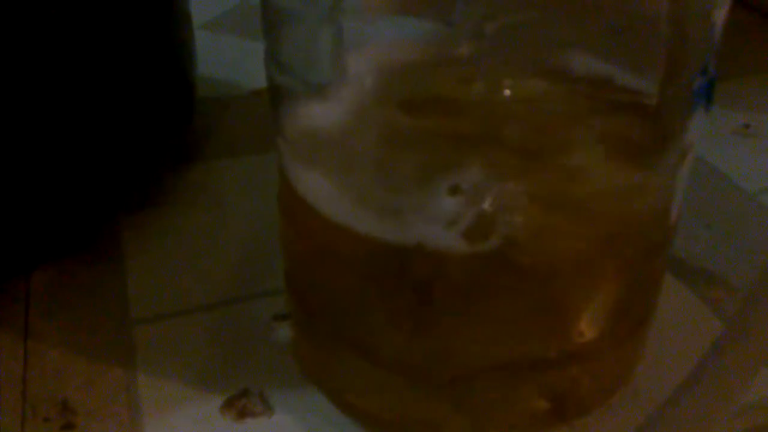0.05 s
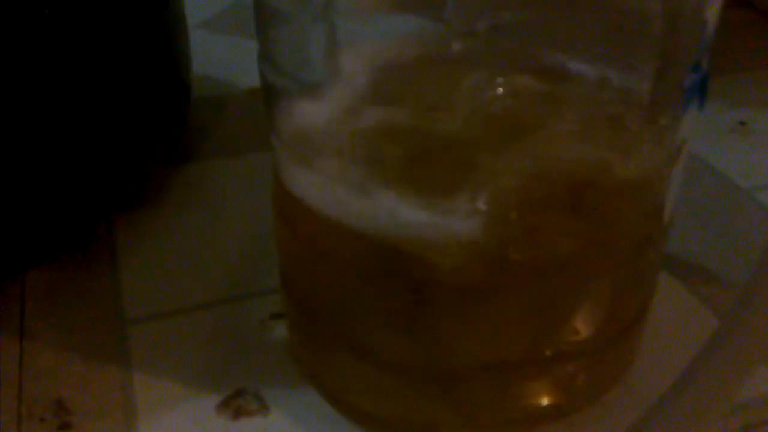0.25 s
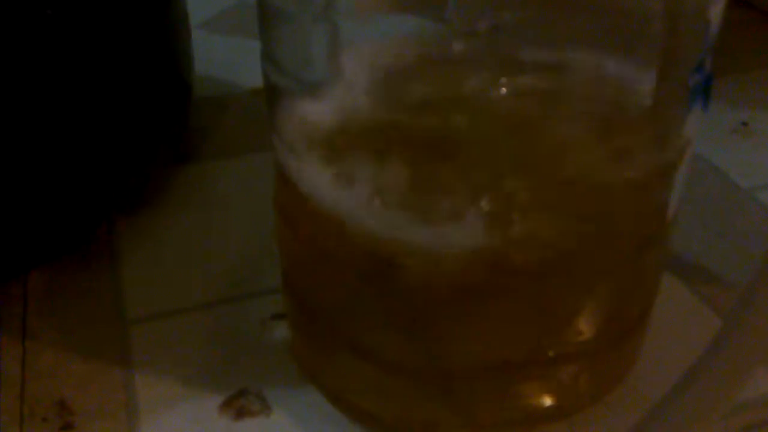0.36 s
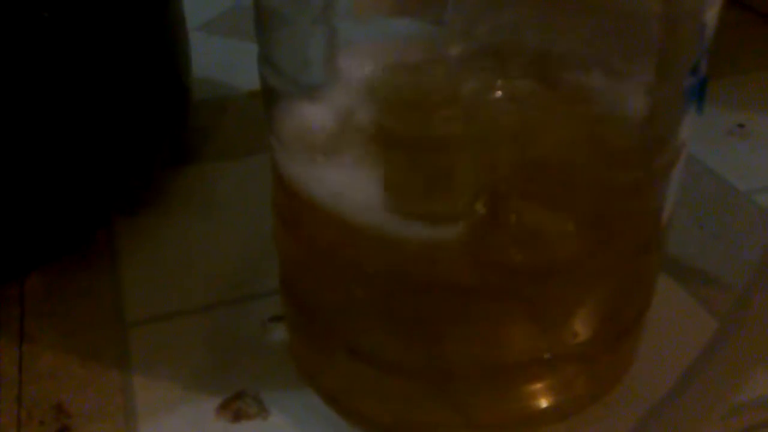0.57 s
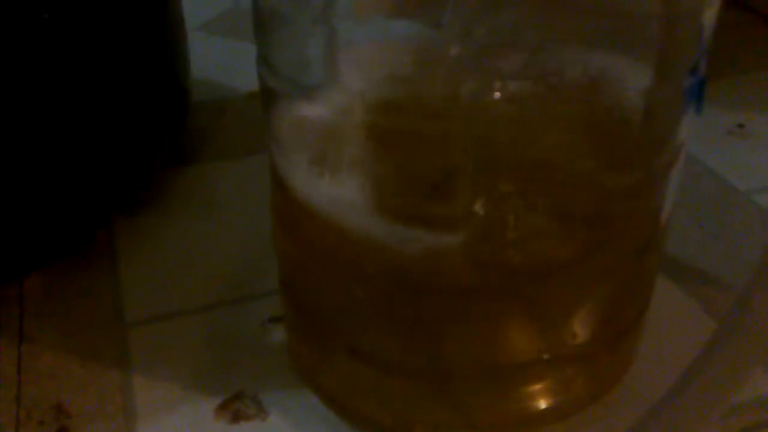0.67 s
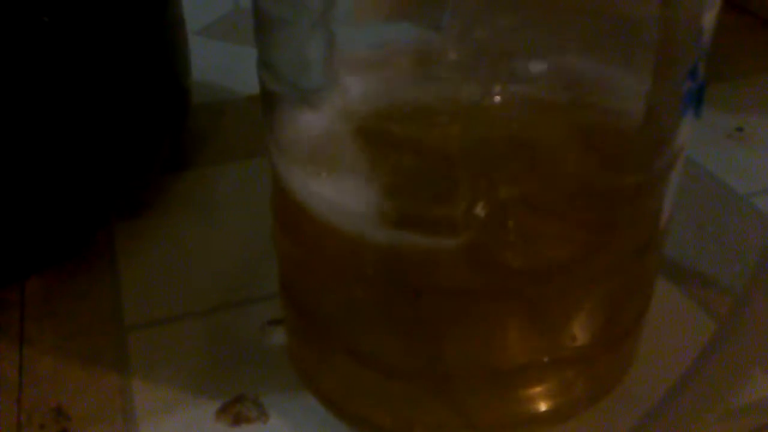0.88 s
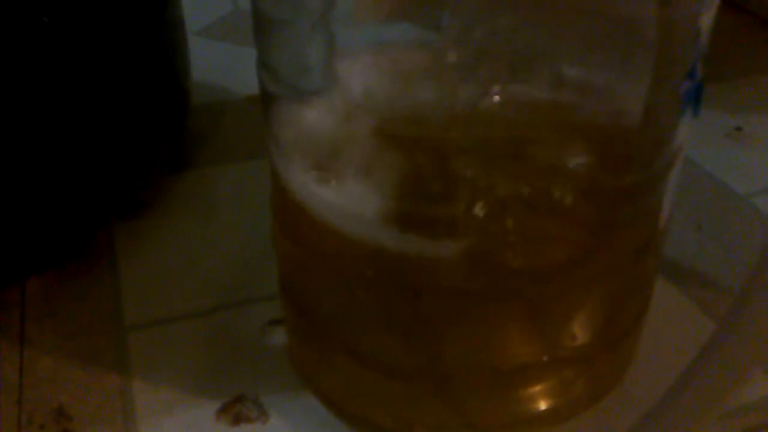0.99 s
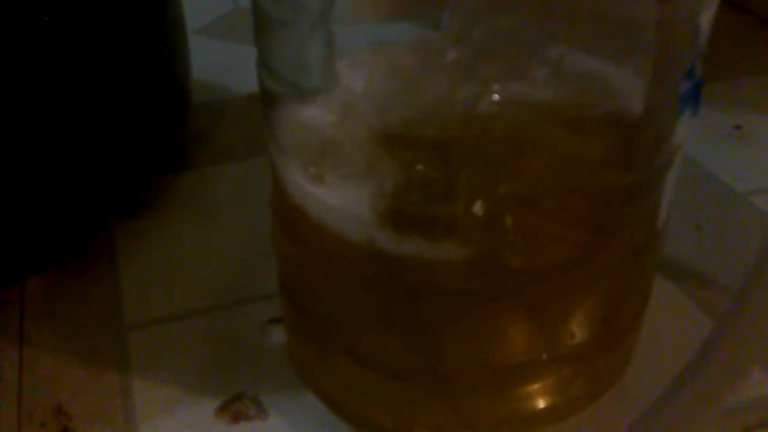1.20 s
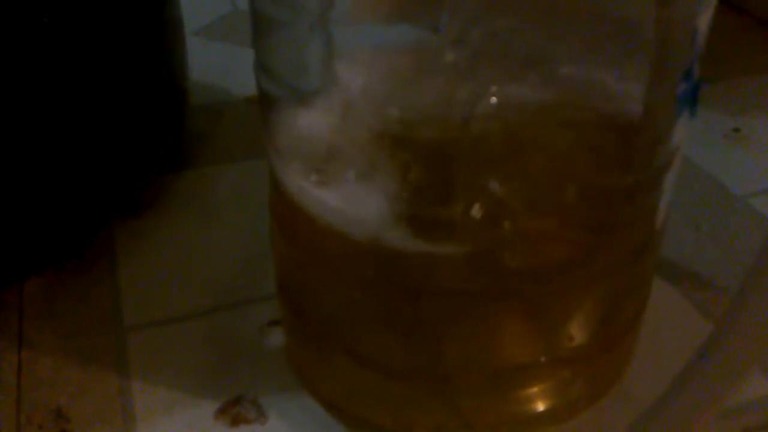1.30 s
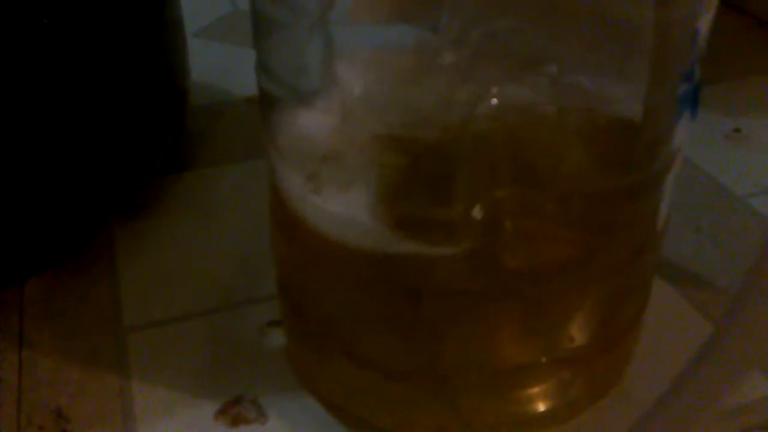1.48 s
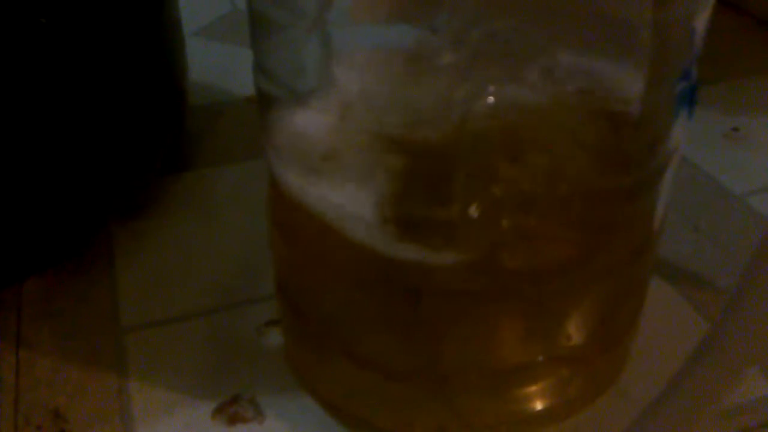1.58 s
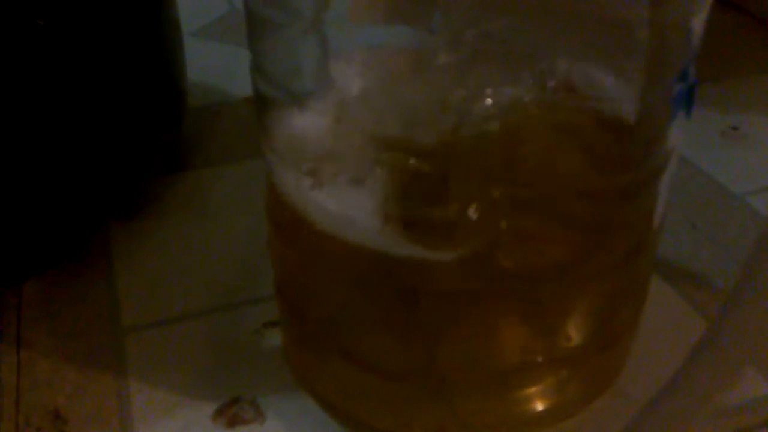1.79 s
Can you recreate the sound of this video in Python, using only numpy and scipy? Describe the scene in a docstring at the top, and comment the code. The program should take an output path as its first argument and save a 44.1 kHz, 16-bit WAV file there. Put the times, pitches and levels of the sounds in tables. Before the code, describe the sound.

Liquid bubbles in a large glass vessel, close up in a small room. From about 0.2 to 0.8 seconds it churns with quick low glugs, wet splats and plinking bubbles, loudest near 0.4 seconds. Slower, regular glugs follow with scattered pops and tiny rising whistles. Pops lightly ping the glass around 0.7 and 1.3 seconds. The bubbling fades by 1.8 seconds, over low sloshing, faint hiss and rumble.

```python
"""A burst of churning, then slower, regular glugs: a brew bubbling in a large glass vessel indoors.
Each gulp of gas rings the vessel's low modes and comes with a wet rush. At the surface, bubbles plink,
films burst, shrinking gas pockets whistle and two pops ping the glass. Close reflections and a small
room surround it, over low sloshing, faint hiss and rumble."""
import sys
import numpy as np
from scipy import signal
from scipy.fft import rfft, irfft
from scipy.io import wavfile

SR = 44100
rng = np.random.default_rng(int(sys.argv[2]) if len(sys.argv) > 2 else 0)


def dump(signal):
    """Clip the signal to [-1, 1] and save it as 16-bit WAV at the path in sys.argv[1]."""
    limited = np.clip(np.atleast_2d(signal).T, -1, 1)
    pcm = np.round(limited * 32767).astype(np.int16)
    wavfile.write(sys.argv[1], SR, pcm)


N = 81585
PLINK_ATTACK_S = 0.0017  # bubbles and glass pings share this soft edge


def amp(db):
    """Decibels to gain."""
    return 10 ** (np.asarray(db) / 20)


def unit(x):
    """Scales to rms 1."""
    return x / np.sqrt(np.mean(x ** 2) + 1e-20)


def colour(points, hz):
    """Reads a curve over log frequency."""
    f, value = np.transpose(points)
    return np.interp(np.log(hz + 1), np.log(f + 1), value)


def ticks(size):
    """Sample times in seconds."""
    return np.arange(size) / SR


def fader(points):
    """Gain per sample from a level curve in dB."""
    return amp(np.interp(ticks(N), *np.transpose(points)))


def add(mix, start_s, sound):
    """Drops a sound into the mix."""
    part = mix[max(round(start_s * SR), 0):][:len(sound)]
    part += sound[:len(part)]


def ring(t, attack_s, t60):
    """Quick attack and exponential decay."""
    return (1 - np.exp(-t / attack_s)) * np.exp(-np.log(1000) * t / t60)


def noise(spectrum):
    """Steady coloured noise at rms 1."""
    gains = amp(colour(spectrum, np.fft.rfftfreq(N, 1 / SR)))
    return unit(irfft(rfft(rng.standard_normal(N)) * gains, N))


def puff(hz, width_octaves, t60):
    """A short burst of noise around one pitch."""
    t = ticks(4096)
    octaves_off = np.log2((np.fft.rfftfreq(len(t), 1 / SR) + 1) / hz)
    band = 1 / (1 + (octaves_off / width_octaves) ** 2 / 2) ** 2
    return ring(t, attack_s=0.0009, t60=t60) * unit(irfft(rfft(rng.standard_normal(len(t))) * band))


def wobble(size, width_hz, share):
    """Random flutter of a tone's strength and phase; share 0 leaves it clean."""
    hz = np.fft.fftfreq(size, 1 / SR)
    fuzz = np.fft.ifft(np.exp(2j * np.pi * rng.random(size)) / (1 + (hz / width_hz) ** 2))
    return np.sqrt(1 - share) + np.sqrt(share) * fuzz / np.std(fuzz)


def echoes(x, decay):
    """Sparse reflections of random sign, dying along a curve of (frequency [Hz], t60 [s])."""
    taps = rng.choice([-1., 1.], 16384) * (rng.random(16384) < .08)
    taps[:31] = 0  # pre-delay
    hz, t, bands = signal.stft(taps, SR, nperseg=128)
    fade = np.exp(-np.log(1000) * t / colour(decay, hz)[:, None])
    tail = signal.istft(bands * fade, SR)[1]
    return signal.fftconvolve(x, tail / np.linalg.norm(tail))[:N]


def noise_floor():
    """A bed of faint hiss and deep rumble that swells and eases off."""
    # (frequency [Hz], relative density [dB])
    hiss_colour = [(20, 20), (150, 28), (450, -2), (1100, 4.5), (7000, 2), (11000, 1), (15500, 1.5)]
    rumble_colour = [(5, -33), (18, -5), (29, 2), (37, -41), (45, -17), (70, -8), (200, -48)]
    # fader moves (time [s], level [dB])
    hiss_level = [(0, -74), (.18, -70), (.32, -56.5), (1.45, -55.5), (1.66, -57.5), (1.85, -62)]
    rumble_level = [(0, -71), (.2, -85), (.7, -45), (.86, -46.5), (1.4, -57.5), (1.85, -63)]
    return noise(hiss_colour) * fader(hiss_level) + noise(rumble_colour) * fader(rumble_level)


def room(send):
    """A small room's short tail, with the treble dying first."""
    # reverb time (frequency [Hz], t60 [s])
    decay = [(150, 0.2), (2000, 0.21), (8000, 0.11)]
    return echoes(send, decay)


def slosh():
    """The liquid sloshes in slow, bassy swells."""
    # weight of the liquid (frequency [Hz], relative density [dB])
    spectrum = [(15, -27), (45, -15.5), (68, -6), (81, -23), (97, -3.5), (125, -9.5), (250, -57.5)]
    # surges (time [s], level [dB])
    swells = [(0, -99), (.11, -80), (.19, -47.5), (.43, -41.5), (.6, -50.5), (.75, -47), (.85, -67),
              (1.3, -49), (1.85, -68.5)]
    return noise(spectrum) * fader(swells)


def churn():
    """A wash of bubbles of all sizes, as loud as the surface is stirred."""
    # stirring of the surface (time [s], level [dB])
    stirring = [(0, -91), (.11, -68.5), (.16, -55.5), (.24, -43), (.33, -48.5), (.365, -52), (.42, -45.5),
                (.49, -47.5), (.53, -52.5), (.75, -48), (.83, -64), (1.05, -62), (1.17, -55), (1.45, -57),
                (1.85, -71)]
    # balance of bubble sizes (pitch [Hz], relative level [dB])
    balance = [(220, -14.5), (400, -4.5), (800, -9.5), (1400, -15), (3000, -21.5), (6000, -22.5),
               (12000, -34)]
    births_per_s, decay_cycles, spread_db = 70, 4.9, 3.5  # for each size
    out, t = np.zeros(N), ticks(4096)
    for hz in np.geomspace(220, 12000, 36):
        age = t * hz / decay_cycles
        rising_hz = hz * (1 + 0.114 * np.minimum(age, 2))
        envelope = (1 - np.exp(-10 * age)) * np.exp(-age)
        bubble = envelope * np.sin(2 * np.pi * np.cumsum(rising_hz) / SR)
        births = rng.random(N) < births_per_s / SR
        strengths = amp(spread_db * np.minimum(rng.exponential(1, N), np.pi))
        out += amp(colour(balance, hz)) * unit(signal.oaconvolve(births * strengths, bubble)[:N])
    return unit(out) * fader(stirring)


def whistles():
    """A pocket of gas shrinks, so its fluttering note sweeps up."""
    # gas pockets (time [s], length [s], start pitch [Hz], end pitch [Hz], level [dB])
    pockets = [(1.182, .055, 700, 1284, -55.5), (1.371, 0.053, 772, 1506, -53)]
    out = np.zeros(N)
    for s, length, from_hz, to_hz, db in pockets:
        progress = np.arange(0, 1, 1 / (length * SR))
        tone = np.exp(2j * np.pi * np.cumsum(from_hz + (to_hz - from_hz) * progress) / SR)
        flutter = wobble(N, width_hz=100, share=0.22)[:len(progress)]
        add(out, s, amp(db) * np.sqrt(np.sin(np.pi * progress)) * (tone * flutter).imag)
    return out


def pings(hz=3415, t60=0.16):
    """A pop against the wall leaves a thin ring in the glass."""
    # pops on the glass (time [s], level [dB])
    pops = [(0.715, -56), (1.312, -48.5)]
    out, t = np.zeros(N), ticks(8192)
    for s, db in pops:
        add(out, s, amp(db) * ring(t, PLINK_ATTACK_S, t60) * np.sin(2 * np.pi * hz * t))
    return out


def splats():
    """A bursting film gives a short wet puff."""
    # bursting films (time [s], level [dB], centre [Hz], t60 [s])
    films = [(.086, -63, 706, 0.11), (0.128, -55, 740, 0.11), (.173, -46.5, 800, 0.11),
             (0.2237, -32, 970, 0.024), (0.245, -47, 4060, 0.039), (0.254, -41.5, 1830, 0.029),
             (0.2738, -39, 1100, 0.024), (0.305, -46, 1300, 0.21), (.319, -50.5, 2250, 0.27),
             (0.342, -41, 3670, 0.018), (.391, -39, 960, 0.039), (.392, -46.5, 5760, 0.039),
             (0.44, -50.5, 2430, 0.051), (0.449, -46.5, 10500, 0.018), (0.47, -40, 1290, 0.13),
             (.474, -49, 6850, 0.022), (0.537, -48, 1400, 0.09), (.5942, -37.5, 1125, 0.046),
             (0.594, -41, 3540, 0.056), (.679, -46.5, 700, 0.13), (.7315, -34.5, 1000, 0.034),
             (1.1455, -43.5, 900, 0.051), (1.249, -46.5, 710, 0.048), (1.324, -45, 2760, 0.031),
             (1.437, -48, 1310, 0.049)]
    out = np.zeros(N)
    for s, db, hz, t60 in films:
        add(out, s, amp(db) * puff(hz, width_octaves=0.66, t60=t60))
    return out


def plinks():
    """A bubble rings briefly and glides as it nears the surface; the smallest pop more than they ring."""
    # ringing bubbles (time [s], start pitch [Hz], level [dB], t60 [s], glide [octaves/s])
    bubbles = [(.178, 4140, -48, 0.022, -10), (0.223, 6120, -48.5, 0.033, -9),
               (0.254, 3700, -34, 0.023, -2), (0.269, 7620, -38, 0.018, -7), (0.274, 1076, -27, 0.027, 28),
               (.304, 251, -27, 0.053, 1), (0.2786, 9200, -38, 0.014, -4), (.324, 2177, -35.5, 0.047, 5),
               (.329, 494, -35, 0.033, -3), (.411, 520, -28, 0.019, 15), (0.412, 1057, -33, 0.03, 8),
               (0.424, 1600, -38, 0.02, 8), (0.4437, 1180, -32.5, 0.056, 9.5),
               (0.445, 398, -23, 0.067, 4.5), (.451, 7670, -40, 0.04, 3.5), (0.5956, 1880, -35, 0.044, 1.5),
               (.595, 2866, -32.5, 0.025, -3), (.596, 4520, -33.5, 0.021, -4),
               (0.649, 2730, -37.5, 0.027, 2), (0.649, 4200, -41.5, .025, 16.5),
               (0.7013, 4210, -30, 0.017, 5), (0.716, 3500, -33.5, 0.023, -6),
               (0.742, 1483, -25, 0.038, -3), (0.802, 10800, -47.5, 0.04, -15), (1.144, 393, -36, 0.083, 4),
               (1.147, 1740, -49, 0.094, 3.5), (1.149, 5020, -51, 0.038, 7), (1.31, 1347, -40, 0.051, 48),
               (1.311, 3393, -35.5, 0.038, -5), (1.318, 1740, -42, 0.03, -5),
               (1.438, 1738, -34.5, 0.028, -2), (1.434, 1456, -44.5, 0.086, 4), (1.49, 8700, -45, 0.027, 9),
               (1.515, 2164, -52.5, 0.091, -1.5), (1.517, 1227, -42, 0.055, 17),
               (1.6186, 5760, -44, 0.035, 7.5)]
    all_fuzz_hz, fuzz_fade_s = 5230, 0.027  # from this pitch up, the attack is pure fuzz
    out, t = np.zeros(N), ticks(4096)
    for s, hz, db, t60, glide in bubbles:
        fuzz_share = min(hz / all_fuzz_hz, 1) ** 2 * np.exp(-t / fuzz_fade_s)
        tone = np.exp(2j * np.pi * np.cumsum(hz * 2 ** (glide * t)) / SR)
        flutter = wobble(len(t), width_hz=0.1 * hz, share=fuzz_share)
        add(out, s, amp(db) * ring(t, PLINK_ATTACK_S, t60) * (tone * flutter).imag)
    return out


def glugs():
    """Each gulp knocks the vessel's modes and adds a wet rush; a sharper gulp favours the upper modes."""
    # gulps of gas (time [s], level [dB], brightness [dB/octave], pitch [ratio])
    gulps = [(0.09, -36.5, -7.5, 0.87), (0.131, -31.5, 3, 0.9), (0.1728, -34.5, 8.5, 1.23),
             (0.1898, -22.5, -4.5, 1.04), (0.2204, -21, -3, 1.07), (0.2638, -19, -4, 0.94),
             (0.3015, -19.5, 1, 0.85), (0.3382, -20, -9, 0.95), (0.3783, -22.5, 0, 1.2),
             (0.3947, -13.5, -1.5, 0.91), (0.4104, -27.5, 8.5, 1.02), (0.4224, -21.5, 5, 1.16),
             (0.4405, -24, 4.5, 0.92), (0.476, -17, -37, 0.96), (0.499, -25.5, 1.5, 1.04),
             (0.532, -36, 4, 1.05), (0.5634, -25.5, -5, 0.97), (0.593, -26, -1.5, 0.94),
             (0.6302, -21.5, 1.5, 1.056), (0.66, -33.5, 3, 1.2), (0.687, -27, 6, 0.79),
             (0.728, -27.5, 3, 1.06), (0.7793, -29.5, -10, 1.1), (0.8644, -26.5, -1, 0.9),
             (0.9155, -29.5, 4, 1), (0.9793, -28.5, -6, 1.15), (1.0496, -23.5, -3.5, 0.94),
             (1.1165, -26, -1, 1.02), (1.1432, -34, 4.5, 1.11), (1.1881, -29, 1, 1.01),
             (1.247, -27.5, 3, 1.05), (1.301, -24, -1.5, 0.94), (1.3413, -36.5, 3, 0.89),
             (1.3777, -26.5, -1.5, 0.96), (1.4445, -29, 3.5, 0.87), (1.4638, -37.5, 6, 0.97),
             (1.5235, -31, -4, 0.98), (1.5767, -42, 9, 0.74), (1.6303, -35, 3, 0.94),
             (1.6897, -50, 5.5, 0.97), (1.752, -38.5, 1.5, 0.95)]
    # vessel modes (frequency [Hz], level [dB], t60 [s], polarity [+/-1], gulp pitch tracking [0..1])
    modes = [(145.43, -3.5, 0.2, -1, 0.094), (170.7, -3, 0.075, 1, 0.96), (234.7, -10.5, 0.087, 1, 0.66),
             (269, -21.5, 0.14, 1, 0.23), (298.3, -9.5, 0.09, -1, 0.96), (311, -16.5, 0.1, 1, 0.025),
             (350.4, -17.5, 0.049, -1, 1), (410, -23, 0.14, -1, 0.034), (444, -22, 0.097, -1, 0.028),
             (483.8, -18, 0.13, 1, 0.021)]
    pivot_hz, tilt_top_hz, rush_db = 142.3, 384, -28.5
    out, t = np.zeros(N), ticks(14000)
    for s, db, tilt_db, pitch in gulps:
        for hz, mode_db, t60, polarity, tracking in modes:
            gain = amp(db + mode_db + tilt_db * np.log2(min(hz, tilt_top_hz) / pivot_hz))
            attack_s = 0.0013 + 0.004 * (1 - tracking)  # the vessel's own, steady modes build more slowly
            tone = polarity * np.sin(2 * np.pi * hz * pitch ** tracking * t)
            add(out, s, gain * ring(t, attack_s, t60) * tone)
        add(out, s, amp(db + tilt_db + rush_db) * puff(hz=700, width_octaves=0.35, t60=0.099))
    return out


def scene():
    """Glugs and surface detail, with tight glass reflections and a touch of room, over the noise beds."""
    body = glugs()
    surface = plinks() + pings() + splats() + whistles() + churn()
    surface += amp(-12) * echoes(surface, decay=[(1000, 0.012)])  # slap off the glass
    reverb = room(amp(-14) * surface + amp(-26) * body)
    return (body + surface + reverb + noise_floor() + slosh())[None]


def record(dry):
    """A steep low-pass trims the very top."""
    low_pass = signal.firwin(511, cutoff=15800, window=("kaiser", 9), fs=SR)
    return signal.oaconvolve(dry, low_pass[None], "same")


dry = scene()
out = record(dry)
dump(out)
```